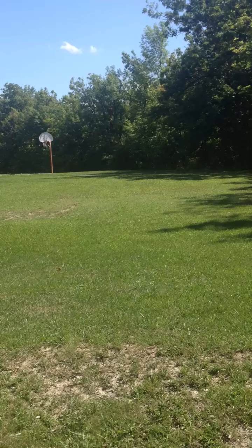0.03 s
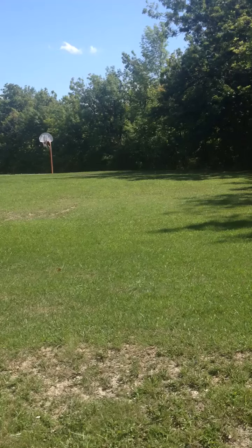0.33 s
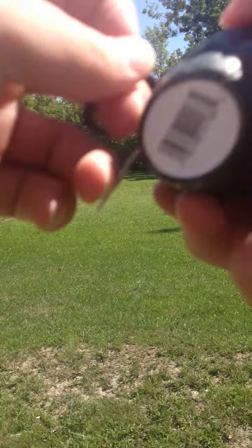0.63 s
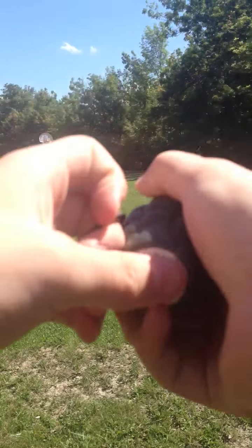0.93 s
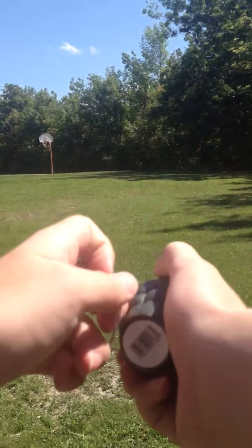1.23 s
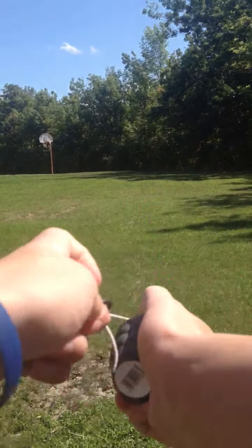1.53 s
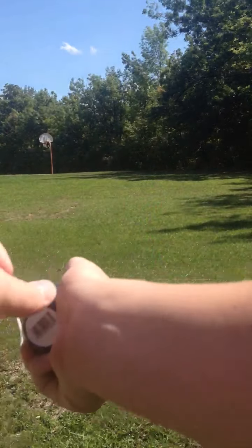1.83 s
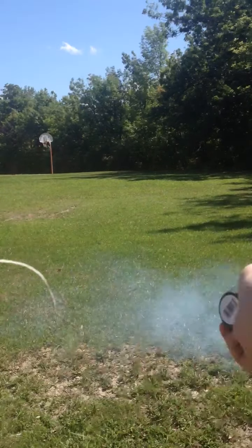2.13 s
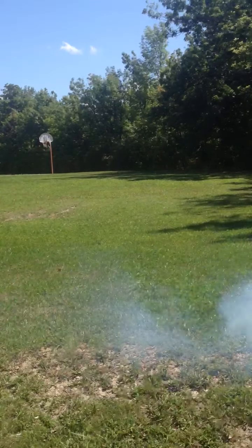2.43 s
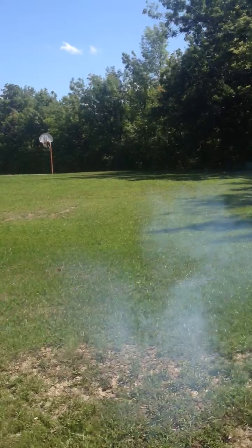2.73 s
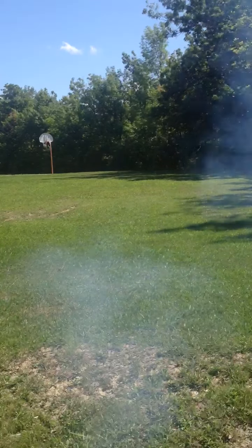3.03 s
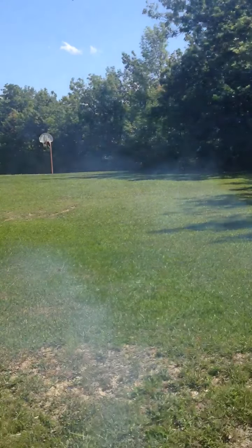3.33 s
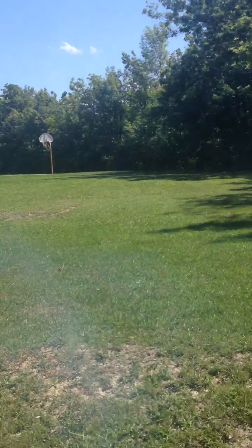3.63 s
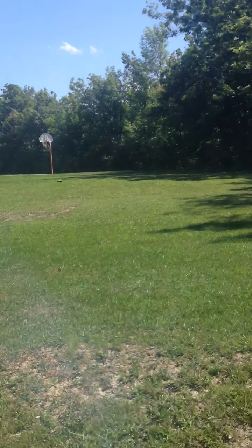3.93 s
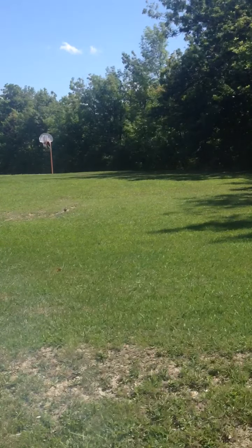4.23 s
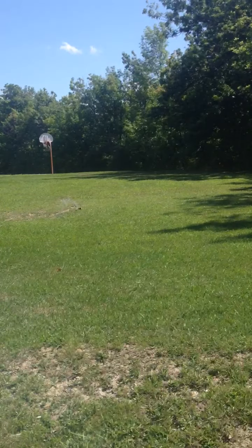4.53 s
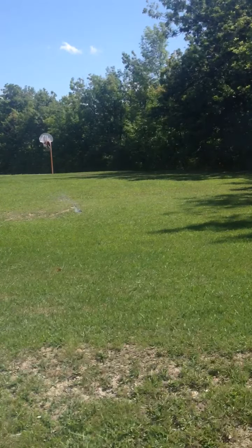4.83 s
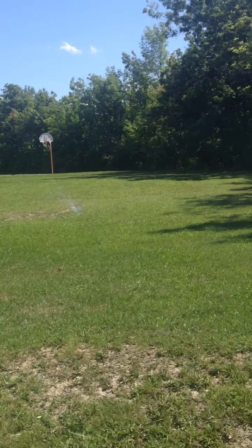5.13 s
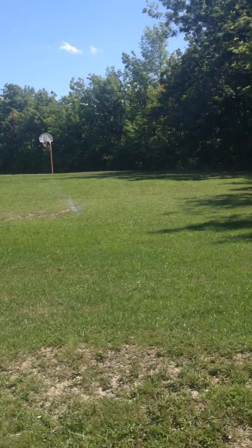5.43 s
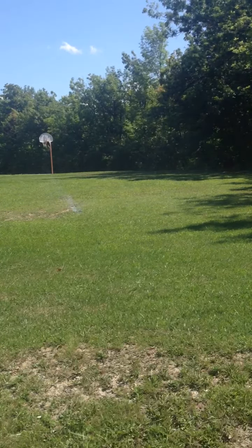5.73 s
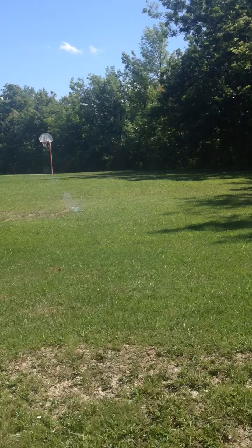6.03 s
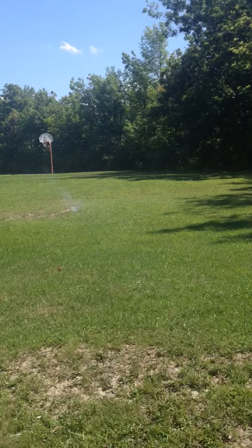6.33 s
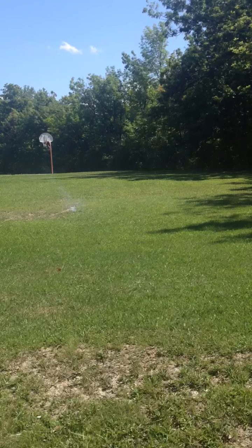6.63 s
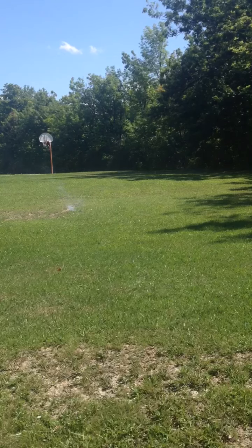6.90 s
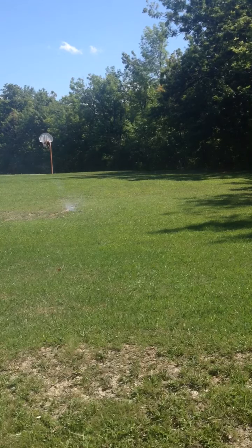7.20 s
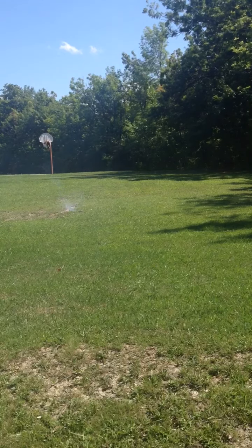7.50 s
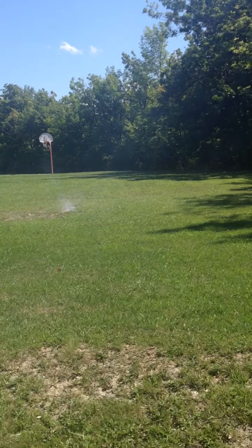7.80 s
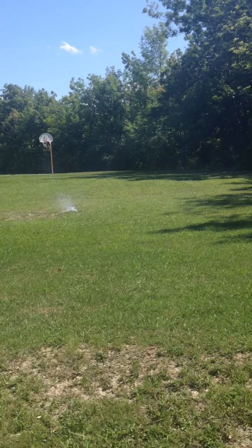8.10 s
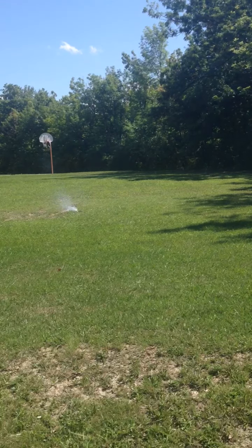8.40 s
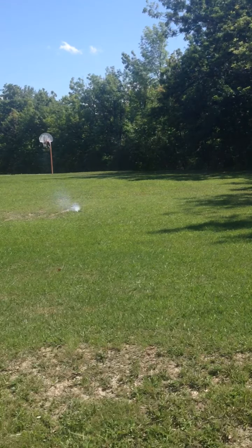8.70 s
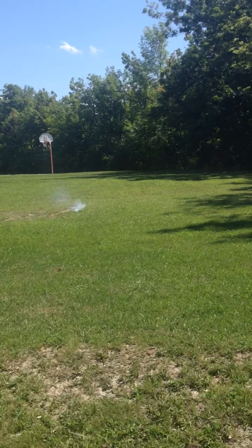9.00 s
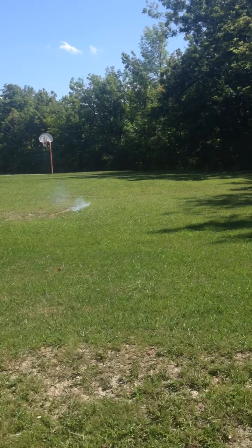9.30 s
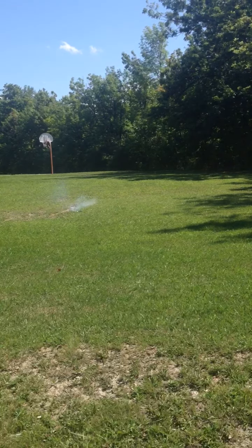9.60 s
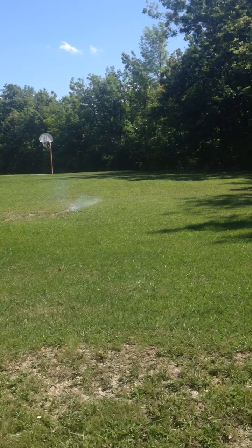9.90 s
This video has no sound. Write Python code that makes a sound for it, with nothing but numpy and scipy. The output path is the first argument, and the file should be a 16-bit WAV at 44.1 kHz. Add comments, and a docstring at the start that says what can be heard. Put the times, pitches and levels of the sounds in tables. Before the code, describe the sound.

Cicadas buzz quietly in the trees around a lawn throughout, over faint distant traffic; a cricket trills briefly at the start. From 0.2 seconds, hands click, scrape and softly bump a plastic smoke grenade close to the microphone, with a sharp clack near 1.5 seconds and a rasp of string just after. At about 2 seconds the igniter fires with a thumping, cracking pop, the loudest sound. The fuse fizzes and spits, a sleeve swishes with the throw near 2.8 seconds, and the fizz fades with thin squeaks by about 3.5. Light puffs of breeze brush the microphone between 1 and 3.5 seconds. At 4.2 seconds the grenade thuds on distant grass, then scuffs faintly. A small bird gives three falling chirps around 5.5 seconds, and more near 7.2 and 8.2. From 6.5 seconds a soft, distant sputtering hiss builds, flares near 7.7, then settles to a faint steady flow.

```python
"""Cicadas in the trees and far traffic over a summer lawn; a cricket trills nearby, a small bird chirps.
Close to the phone's microphone, hands fumble with a plastic smoke grenade, ringing its shell, and pull
its string: the igniter pops, the fuse fizzes and spits, a sleeve swishes with the throw. Far off, the
grenade thuds on the grass and begins to hiss out smoke. Early on, puffs of breeze brush the microphone."""
import sys
import numpy as np
from scipy import signal
from scipy.fft import rfft, irfft, next_fast_len
from scipy.io import wavfile
from scipy.ndimage import uniform_filter1d

SR = 44100
rng = np.random.default_rng(int(sys.argv[2]) if len(sys.argv) > 2 else 0)


def store_pcm(level_fs):
    """Save levels as 16-bit WAV."""
    pcm = np.round(np.clip(level_fs, -1, 1) * 32767).astype(np.int16)
    wavfile.write(sys.argv[1], SR, np.atleast_2d(pcm).T)


N = 438794
T = np.arange(N) / SR
FIRE_S = 2.0526  # the igniter pops and lights the fuse

# gritty rasp of the fingers and the fuse (frequency [Hz], level [dB])
RASP_SPECTRUM = [(200, 13), (500, 0.5), (1200, -0.5), (2200, 3.5), (3500, 4.5), (4700, 8), (5400, -1.5),
                 (8000, -8), (11000, -51)]
# the bright fizz above that rasp (frequency [Hz], level [dB])
FIZZ_SPECTRUM = [(4000, -15.5), (7200, 4), (10200, -4.5), (12900, 5), (15300, -4)]


def undb(db):
    """Decibels to gain."""
    return 10 ** (np.asarray(db) / 20)


def unit(x):
    """Scale to rms 1."""
    return x / np.sqrt(np.mean(x ** 2))


def peak(x, db):
    """Scale to a peak level."""
    return x * undb(db) / np.abs(x).max()


def curve(table, column=1):
    """Gain over time from a dB column; silent outside the table."""
    rows = np.array(table)
    return undb(np.interp(T, rows[:, 0], rows[:, column], left=-140, right=-140))


def colour(x, points):
    """Shape by (frequency [Hz], level [dB]) points, falling 24 dB an octave beyond the ends; rms 1."""
    hz, db = np.transpose(points)
    size = next_fast_len(len(x))
    octave = np.log2(np.fft.rfftfreq(size, 1 / SR) + 1)
    beyond = np.abs(octave - np.clip(octave, np.log2(hz[0]), np.log2(hz[-1])))
    gain = undb(np.interp(octave, np.log2(hz), db) - 24 * beyond)
    return unit(irfft(rfft(x, size) * gain, size)[:len(x)])


def ring(x, hz, width_hz):
    """One resonance."""
    return signal.lfilter(*signal.iirpeak(min(hz, .45 * SR), hz / min(width_hz, SR / 3), SR), x)


def ring_twice(x, hz, width_hz):
    """The same resonance twice over, for steeper skirts."""
    return ring(ring(x, hz, width_hz), hz, width_hz)


def low_cut(x, hz):
    """Roll off the bass."""
    return signal.sosfilt(signal.butter(2, hz, "highpass", fs=SR, output="sos"), x)


def walk(rate):
    """Smooth random wander with a spread near 1."""
    step = int(SR / rate)
    return 1.2 * uniform_filter1d(np.repeat(rng.standard_normal(N // step + 1), step), step)[:N]


def noise():
    """White noise."""
    return rng.standard_normal(N)


def grains(rate, spread_db):
    """Tiny random clicks of unequal size; rms 1."""
    ticks = (rng.random(N) < rate / SR) * noise()
    return unit(ticks * undb(spread_db * np.minimum(rng.exponential(size=N), 4)))


def swell(t, rise_s):
    """A push that peaks after rise_s and dies away."""
    u = np.maximum(t, 0) / rise_s
    return (u * np.exp(1 - u)) ** 2


def bell(middle_s, half_s):
    """A smooth rise and fall around a moment."""
    return np.exp(-np.minimum(((T - middle_s) / half_s) ** 2, 60))


def held(start_s, stop_s, attack_s, release_s):
    """Attack, hold until stop_s, then an exponential release."""
    return np.clip((T - start_s) / attack_s, 0, 1) * np.exp(-np.clip((T - stop_s) / release_s, 0, 60))


def add(out, s, x):
    """Mix a short sound in at time s."""
    i = int(s * SR)
    out[i:i + len(x)] += x[:N - i]


def traffic():
    """A far road: the roar of tyres with a few wavering whines."""
    # far traffic and air (frequency [Hz], level [dB])
    roar_spectrum = [(30, -42), (65, -32.5), (90, -11.5), (134, -3), (270, -6.5), (400, -7.5), (510, -6),
                     (850, -6.5), (1300, -14), (2100, -24), (4200, -27)]
    # slow drift of the roar (time [s], level [dB])
    roar_levels = [(0, -53.5), (2, -57), (6.3, -55.5), (8.5, -53), (9.95, -53.5)]
    # faint vehicle whines (middle [s], half length [s], pitch [Hz], level [dB])
    whines = [(7.5, .5, 298, -62.5), (7.88, .22, 525, -58.5), (7.6, .9, 755, -64)]
    out = colour(noise(), roar_spectrum) * curve(roar_levels) * undb(.5 * walk(3.1))
    for s, half_s, hz, db in whines:
        tone = np.sin(2 * np.pi * np.cumsum(hz * (1 + .00806 * walk(22))) / SR)
        out += unit(tone * undb(walk(14))) * undb(db) * bell(s, half_s)
    return out


def cicadas():
    """Up in the trees many tymbals blur into two choruses; nearer insects buzz at their own rates."""
    # slow swell of the choruses (time [s], low chorus [dB], high chorus [dB])
    chorus_levels = [(0, -56.5, -53.5), (2.2, -59.5, -58), (3.3, -56, -55), (5.7, -55.5, -56),
                     (7, -57, -62.5), (9.95, -58, -61.5)]
    # colour of the low chorus (frequency [Hz], level [dB])
    low_spectrum = [(4000, -19.5), (4750, -10), (5250, -14), (6200, -8.5), (6650, -1.5), (7020, 2),
                    (7160, -13.5), (7600, -15.5), (8300, -9.5), (9800, -32.5)]
    # colour of the high chorus (frequency [Hz], level [dB])
    high_spectrum = [(6000, -20.5), (7000, -5), (7300, 6.5), (7800, -1.5), (8600, -2.5), (9300, -6),
                     (10200, -19), (12600, -13.5), (15400, -21.5)]
    # single cicadas (start [s], stop [s], tymbal ring [Hz], width [Hz], pulse rate [1/s], level [dB])
    soloists = [(.6, 1.25, 8300, 150, 120, -64), (2.9, 5.6, 8300, 1900, 355, -61),
                (6.2, 10, 8560, 160, 70, -70), (5.8, 10, 7258, 70, 42.5, -66)]
    out = colour(grains(9000, .52), low_spectrum) * curve(chorus_levels) * undb(.5 * walk(30))
    out += colour(grains(9000, .71), high_spectrum) * curve(chorus_levels, 2) * undb(.5 * walk(30))
    for start, stop, hz, width_hz, rate, db in soloists:
        phase = np.cumsum(rate * (1 + .002 * walk(1.5))) / SR
        # each buckle of the tymbal is a short burst at the ring frequency
        since = phase % 1 / rate
        buckles = np.sin(2 * np.pi * hz * since) * np.exp(-np.pi * width_hz * since)
        buckles *= 1 + .27 * noise()
        fade = np.clip(np.minimum(T - start, stop - T) / .46 + .5, 0, 1)
        out += unit(ring(buckles, hz, width_hz)) * fade * undb(db + 1.4 * walk(11))
    return out


def cricket(start_s=.131, top_hz=8680, repeat_s=.054, length_s=.022, arch_hz=300, db=-54, count=7):
    """A short trill nearby: each wing stroke is a thin tone whose pitch arches up and back."""
    out = np.zeros(N)
    arch = np.sin(np.pi * np.linspace(0, 1, int(length_s * SR)))
    stroke = arch * np.sin(2 * np.pi * np.cumsum(top_hz - arch_hz * (1 - arch)) / SR)
    for k, scatter in enumerate(rng.standard_normal(count)):
        add(out, start_s + k * repeat_s, undb(db + 2 * scatter) * stroke)
    return out


def shell(x):
    """Ring the grenade's plastic shell; rms 1."""
    # modes of the shell (frequency [Hz], nominal width [Hz], level [dB])
    modes = [(1740, 410, 0), (2080, 150, -5), (2600, 220, -6), (3730, 670, -3.5), (4650, 233, -1.5)]
    return unit(sum(undb(db) * ring_twice(x, hz, 1.8 * width) for hz, width, db in modes))


def clicks(ring_s=.00039, body_s=.0022, body_db=-19, snap_s=.00083):
    """Close to the microphone, each click rings the damped shell for a few cycles under a bright snap."""
    # clicks of shell and pull ring (time [s], pitch [Hz], tone level [dB], snap level [dB])
    contacts = [(0.192, 3960, -37, -46), (.2817, 3340, -44, -27), (.6753, 2220, -34, -33),
                (0.7473, 3470, -32, -35), (.7627, 1750, -28, -27), (.9952, 4400, -35, -33),
                (1.4483, 2110, -18.5, -33), (1.462, 1950, -8, -17.5), (1.4767, 2320, -14.5, -29),
                (1.4873, 2160, -28, -52), (1.683, 2800, -25, -43), (1.6908, 3570, -25.5, -44),
                (2.013, 4930, -22, -17), (2.0348, 3600, -17, -32), (2.038, 2870, -14, -27)]
    out, t = np.zeros(N), T[:2048]
    for s, hz, tone_db, snap_db in contacts:
        body, snap = rng.standard_normal((2, len(t)))
        tone = peak(ring(np.sin(2 * np.pi * hz * t) * np.exp(-t / ring_s), hz, 2500), 0)
        tone += peak(shell(body * np.exp(-t / body_s)), body_db)
        snap *= np.exp(-t / snap_s)
        snap = ring_twice(snap, 6850, 1500) + .55 * ring_twice(snap, 12700, 4500)
        add(out, s, peak(tone, tone_db + .5) + peak(snap, snap_db + .5))
    return out


def bumps(hz=151, rise_s=.0051):
    """Soft, low handling bumps on the phone, close to the microphone."""
    # low bumps at the microphone (time [s], peak [dB])
    nudges = [(.232, -40.5), (.443, -36.5), (0.479, -43), (1.66, -41.5), (1.839, -47), (2.737, -42)]
    out, t = np.zeros(N), T[:4096]
    bump = low_cut(swell(t, rise_s) * np.cos(2 * np.pi * hz * t), 90)
    for s, db in nudges:
        add(out, s, peak(bump, db))
    return out


def scrapes(slip_share=.87, smooth_db=-4, flutter_db=2.5):
    """Close up, skin and string catch and slip on the shell and ring its modes."""
    # strokes on the shell (middle [s], half length [s], band centre [Hz], rasp [dB], fizz [dB])
    strokes = [(0.279, 0.012, 2980, -55, -57), (0.528, 0.024, 2800, -52.5, -54),
               (0.618, 0.035, 3400, -53, -57), (0.753, 0.085, 3400, -52, -56),
               (0.89, 0.043, 2300, -55.5, -50.5), (0.992, 0.045, 2400, -57, -55),
               (1.093, 0.029, 1700, -54.5, -59), (1.614, 0.096, 2840, -47, -50),
               (2.986, 0.013, 1500, -53, -62)]
    out = np.zeros(N)
    slips = shell(noise() + slip_share * grains(700, 4))
    sliding = undb(smooth_db) * colour(noise(), RASP_SPECTRUM)
    rubbing = unit(slips + sliding) * undb(flutter_db * walk(70))
    fizz = colour(noise() + .44 * grains(2500, 2.7), FIZZ_SPECTRUM) * undb(2.2 * walk(39.2))
    for s, half_s, hz, rasp_db, fizz_db in strokes:
        out += (undb(rasp_db) * unit(ring(rubbing, hz, hz)) + undb(fizz_db) * fizz) * bell(s, half_s)
    return out


def catches(ring_s=.0015, body_db=-5):
    """The string or a fingernail catches: a short chatter of slips keeps one shell mode singing."""
    # squeaky catches (time [s], length [s], pitch [Hz], peak [dB])
    snags = [(.7995, .005, 4670, -31.5), (1.524, 0.005, 2600, -33), (1.5402, .002, 2520, -33.5)]
    out, t = np.zeros(N), T[:2048]
    for s, length_s, hz, db in snags:
        chatter = undb(body_db) * shell(rng.standard_normal(len(t)))
        grip = np.exp(-np.maximum(t - length_s, 0) / ring_s)
        squeak = (np.sin(2 * np.pi * hz * t) + chatter) * grip
        add(out, s, peak(ring(squeak, hz, hz), db))
    return out


def breeze(band_ratio=1.29, gust_db=2):
    """Eddies right at the microphone port make a narrow, fluttering hum that rises fast and dies away."""
    # puffs over the port (start [s], rise [s], fade [s], level [dB], resonance [Hz])
    puffs = [(.99, 0.016, 0.2, -41.5, 187), (1.73, 0.038, .29, -51, 221), (2.14, .09, 0.34, -47.5, 231),
             (3.09, 0.086, 0.31, -42.5, 216)]
    out, gusts = np.zeros(N), undb(gust_db * walk(35))
    for s, rise_s, fade_s, db, hz in puffs:
        band = [(hz / 2, -34), (hz / band_ratio, -7), (hz, 0), (hz * band_ratio, -6), (2 * hz, -24)]
        eddies = colour(noise(), band)
        # the port saturates, so the flutter keeps an even strength
        even = eddies / (1 + np.abs(signal.hilbert(eddies, next_fast_len(N))[:N]))
        out += undb(db) * held(s, s + rise_s, rise_s, fade_s) * unit(ring_twice(even * gusts, hz, hz))
    return out


def bird(length_s=.064, drop_at_s=.036, drop_ease_s=.0088, echo_db=-6, hook_db=2, flutter_db=3.5):
    """Thin whistles hang on their top note, drop and level out; the trees scatter mostly the top."""
    # falling chirps (time [s], top pitch [Hz], bottom pitch [Hz], level [dB])
    chirps = [(1.212, 4370, 3750, -64), (1.328, 4500, 3600, -62.5), (3.172, 3800, 2950, -64),
              (5.258, 3750, 2800, -62.5), (5.405, 5170, 3510, -50), (5.546, 5120, 3450, -52),
              (5.673, 5080, 3400, -52.5), (7.187, 5180, 3720, -52), (8.138, 5100, 3600, -56),
              (8.285, 5020, 3500, -52)]
    out, t = np.zeros(N), T[:int(length_s * SR)]
    fallen = 1 / (1 + np.exp((drop_at_s - t) / drop_ease_s))
    arch = np.abs(np.sin(np.pi * t / length_s)) ** 1.1
    flutter = undb(flutter_db * walk(150))
    for s, top_hz, bottom_hz, db in chirps:
        vibrato_hz = 25 * np.sin(2 * np.pi * (60 * t + rng.random()))
        hz = top_hz + (bottom_hz - top_hz) * fallen + vibrato_hz
        loudness = undb(db + hook_db * (1 - 2 * fallen)) * arch
        add(out, s, loudness * np.sin(2 * np.pi * np.cumsum(hz) / SR))
    trees = rng.standard_normal(16384) * np.exp(-T[:16384] / .07)
    echo = signal.fftconvolve(out, trees / np.linalg.norm(trees))[:N]
    return out * flutter + undb(echo_db) * ring(echo, 4500, 1800)


def pull_string(hollow_hz=503, width_hz=240):
    """The taut string sticks and slips through its hole and rings the air in the shell."""
    # the string is drawn out (middle [s], half length [s], level [dB])
    draws = [(1.615, 0.12, -52)]
    hollow = unit(ring_twice(grains(900, 2), hollow_hz, width_hz))
    return hollow * sum(undb(db) * bell(s, half_s) for s, half_s, db in draws)


def igniter(drag_s=2.036, crack_s=2.0614, drag_db=-31, thump_db=-4, crack_db=-10, spray_db=-20,
            tail_db=-28):
    """Close up, the string drags through the match, gas thumps out, flame spits from the ringing vent."""
    t = np.maximum(T - FIRE_S, 0)
    lit = t > 0
    thump_hz = 140 + 490 * np.exp(-t / .003)
    thump = swell(t, .0024) ** 1.4 * np.sin(2 * np.pi * np.cumsum(thump_hz * lit) / SR)
    vent = unit(ring(ring(noise(), 4190, 550), 4110, 620))
    crack = unit(np.tanh(vent)) * np.exp(-np.abs(T - crack_s) / .0021)
    spray = colour(noise(), [(140, 7.5), (700, 1.5), (1500, 1.5), (2800, 4), (4400, 5), (5600, -5),
                             (8000, 4), (10500, -5), (13400, -2.5), (15400, -8.5)])
    spray *= undb(spray_db) * swell(t, .0054) + undb(tail_db) * lit * np.exp(-t / .04)
    drag = (T > drag_s) * ~lit * unit(ring(ring(noise(), 2400, 3500), 3200, 3700))
    return undb(drag_db) * drag + undb(thump_db) * thump + undb(crack_db) * crack + spray


def fuse(rasp_db=-55, rasp_s=.82, fizz_db=-55, thrown_s=3.0, fade_s=.23, grain_share=.63):
    """The fuse burns and surges in the hand; its rasp dies first, its fizz as it flies out of earshot."""
    # surges of the flame (middle [s], rasp gain [dB])
    surges = [(2.24, 9.5), (2.54, 4)]
    surge_db = sum(db * bell(s, half_s=.047) for s, db in surges)
    size = next_fast_len(N)
    hz = np.fft.rfftfreq(size, 1 / SR)
    grit = rfft(colour(noise() + grain_share * grains(1500, 3.2), RASP_SPECTRUM), size)
    edges_hz = np.append(0, np.geomspace(700, 11000, 13))
    rasp = np.zeros(N)
    for low, high in zip(edges_hz, edges_hz[1:]):  # each band flutters on its own
        rasp += irfft(grit * (hz >= low) * (hz < high), size)[:N] * undb(2.5 * walk(29.82))
    rasp *= undb(rasp_db + surge_db) * held(FIRE_S, FIRE_S + rasp_s, .02, fade_s)
    fizz = colour(noise() + grain_share * grains(2500, 3.5), FIZZ_SPECTRUM) * undb(1.6 * walk(40))
    fizz *= undb(fizz_db + .57 * surge_db) * held(FIRE_S, thrown_s, .2, fade_s)
    return rasp + fizz


def spits(decay_s=.0028, sputter_s=2.84, sputter_half_s=.27, sputter_per_s=40, sputter_db=-57.5):
    """Grains of powder burst with a short, bright crackle; small ones sputter around the sharp spits."""
    # sharp spits of the fuse (time [s], peak [dB])
    sharp_spits = [(2.8665, -33), (3.164, -32)]
    out, t = np.zeros(N), T[:2048]
    crackle = colour(noise(), [(1400, -17), (6000, -18), (9500, -10), (13000, 0), (15000, -6)])
    for s, db in sharp_spits:
        add(out, s, peak(crackle[int(s * SR):][:len(t)] * np.exp(-t / decay_s), db))
    sparks = (rng.random(N) < sputter_per_s / SR) * rng.uniform(.5, 1, N)
    bursts = signal.fftconvolve(sparks, swell(t, rise_s=.0025))[:N]
    return out + undb(sputter_db) * unit(bursts * crackle) * bell(sputter_s, sputter_half_s)


def sleeve(centre_s=2.776, half_s=.032, slip_hz=235, db=-43):
    """With the throw, cloth stutters past the microphone, its lower resonances first."""
    phase = np.cumsum(slip_hz * (1 + .08 * walk(120))) / SR
    slips = unit(np.diff(np.floor(phase), prepend=0) - slip_hz / SR) + 1.8 * noise()
    body = colour(slips, [(70, -28), (120, -6), (170, 6), (300, 0), (480, 1), (900, -5), (1500, -13)])
    cloth = colour(slips, [(700, -19), (1400, -1), (2000, -.5), (2500, -17), (3200, -10.5)])
    return undb(db) * (body * bell(centre_s - .016, half_s) + cloth * bell(centre_s + .0018, half_s))


def fuse_squeaks(rise_s=.0081, width_hz=800):
    """As the grenade is thrown, gas from the fuse squeaks through the same few narrow whistles."""
    # thin squeaks (time [s], level [dB])
    squeaks = [(2.929, -54), (3.088, -55), (3.16, -46), (3.188, -45)]
    # whistles in every squeak (frequency [Hz], relative level [dB])
    whistles = [(11200, 2), (12100, -7), (13900, -8)]
    out, t = np.zeros(N), T[:4096]
    for s, db in squeaks:
        gas = rng.standard_normal(len(t))
        whistle = sum(undb(share_db) * ring_twice(gas, hz, width_hz) for hz, share_db in whistles)
        add(out, s, undb(db) * swell(t, rise_s) * unit(whistle))
    return out


def landing(crush_db=-7.5, scatter_db=-27, scatter_s=.062):
    """Far off, a dull knock on dry turf, a brief crush of grass and a faint scatter off the field."""
    # the grenade lands (time [s], peak [dB])
    impacts = [(4.1775, -27), (4.1833, -39)]
    # it bounces on, only scuffing the grass (time [s], rise [s], level [dB])
    scuffs = [(4.68, 0.0098, -52.5), (4.707, .01, -57)]
    out, t = np.zeros(N), T[:16384]
    grass = colour(noise() + .5 * grains(1500, 1.6), [(200, 4), (1200, -6), (4600, -9), (5500, -21)])
    knock = np.sin(2 * np.pi * 1050 * t) * swell(t, .00077)
    knock += .94 * np.sin(2 * np.pi * 280 * t) * swell(t, .0016)
    grass_gain = undb(crush_db) * swell(t, .0024) + undb(scatter_db) * np.exp(-t / scatter_s)
    for s, db in impacts:
        add(out, s, peak(ring(knock, 610, 2200) + grass[int(s * SR):][:len(t)] * grass_gain, db))
    return out + grass * sum(undb(db) * swell(T - s, rise_s) for s, rise_s, db in scuffs)


def smoke(start_s=6.45, rise_s=.7, full_db=-53, sink_s=7.43, settle_s=.44, steady_db=-59, flare_db=-52):
    """Across the lawn the charge catches: a sputtering jet builds, flares once, sinks to a steady flow."""
    # the jet, dulled by distance (frequency [Hz], level [dB])
    jet_spectrum = [(150, -30), (300, 3.5), (600, 1.5), (1200, 0), (2000, -1.5), (3200, -8.5), (4700, -5.5),
                    (5500, -26), (9000, -31), (15000, -18.5)]
    excess = (undb(full_db) - undb(steady_db)) * held(start_s, sink_s, rise_s, settle_s)
    flow = excess + undb(steady_db) * np.clip((T - start_s) / rise_s, 0, 1)
    jet = colour(noise() + .5 * grains(600, 3), jet_spectrum) * flow
    flare = colour(noise() + .36 * grains(600, 2.2),
                   [(600, -10), (2000, 3.5), (3300, 2), (4700, 3), (5600, -2), (13000, -25)])
    flare *= undb(flare_db) * held(start_s=7.37, stop_s=7.775, attack_s=.25, release_s=.0096)
    return (jet + flare) * undb(1.1 * walk(30))


def scene(shadow_share=.71, shadow_hz=5400, shadow_width_hz=600):
    """The grenade before the field, in mono; hand sounds reach the port with a narrow band weakened."""
    hands = scrapes() + bumps() + pull_string() + clicks() + catches()
    hands -= shadow_share * ring(hands, shadow_hz, shadow_width_hz)
    grenade = hands + igniter() + fuse() + fuse_squeaks() + spits() + sleeve() + landing() + smoke()
    return (grenade + breeze() + cicadas() + cricket() + bird() + traffic())[None]


def record(dry, open_s=.083, notch_share=.32, notch_hz=5500, bottom_hz=35, top_hz=15300):
    """The phone's microphone opens a moment late; its port dulls a narrow band, deep bass and the top."""
    heard = (dry - notch_share * ring(dry, notch_hz, 700)) * (T > open_s)
    high_cut = signal.ellip(10, .2, 70, top_hz, fs=SR, output="sos")
    return signal.sosfilt(high_cut, low_cut(heard, bottom_hz))


dry = scene()
out = record(dry)
store_pcm(out)
```